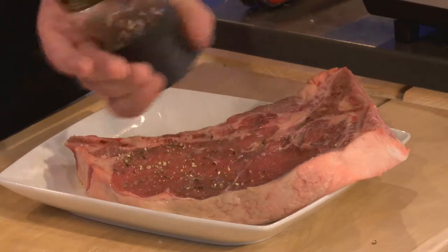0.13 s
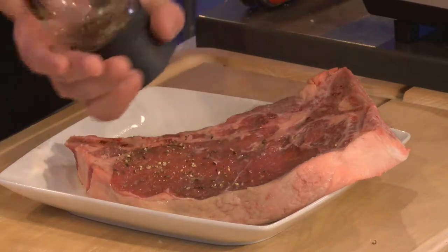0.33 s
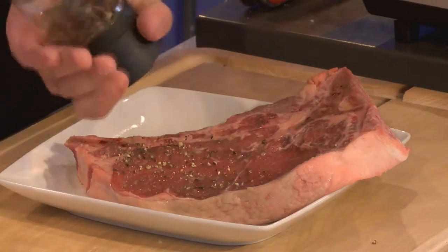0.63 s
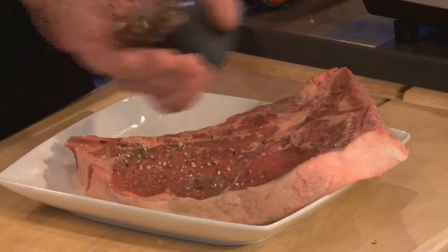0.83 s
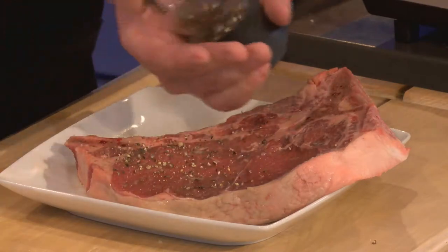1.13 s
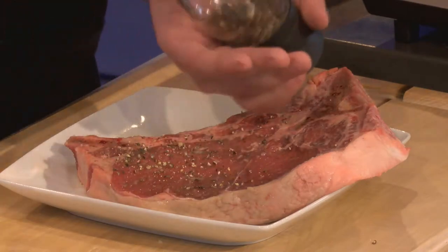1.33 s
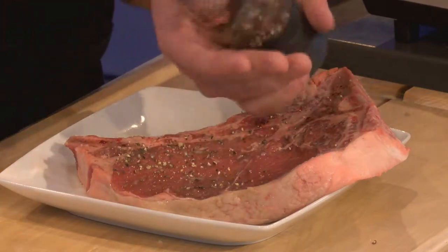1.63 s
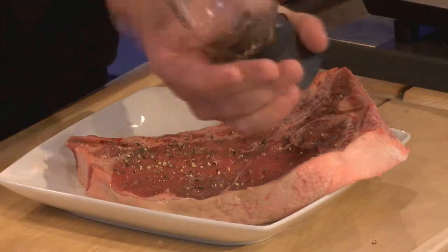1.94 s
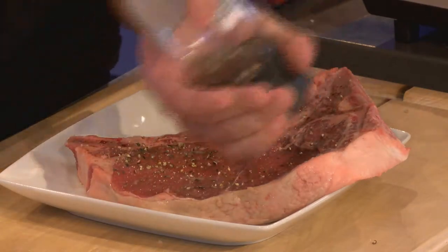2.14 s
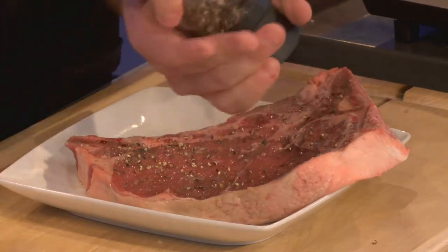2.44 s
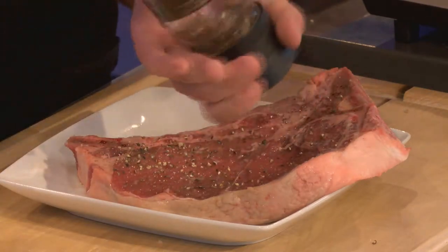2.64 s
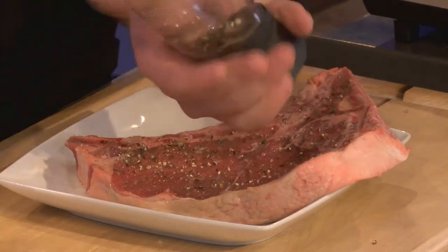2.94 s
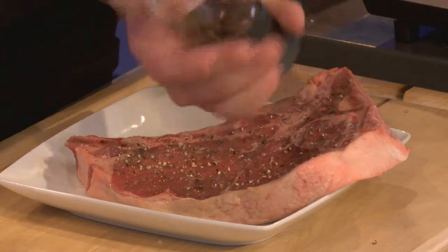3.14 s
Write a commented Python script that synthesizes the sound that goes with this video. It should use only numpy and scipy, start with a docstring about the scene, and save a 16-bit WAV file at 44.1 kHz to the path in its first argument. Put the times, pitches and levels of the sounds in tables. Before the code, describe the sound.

Pepper grinder crunching in brief, uneven twists, with light knocks and pepper ticking down between

```python
"""Pepper mill in a quiet kitchen

A pepper mill is twisted by hand over a steak, close to a microphone. In each of eight strokes peppercorns
crack over a bed of finer crunching: random bursts of splinters and grains, coloured by the mill's body.
The mechanism knocks in its play, and loose pepper ticks and trickles, made of random ticks and noise.
Filtered noise makes a low room rumble and hiss, and sine waves make two appliance tones."""
import sys
import numpy as np
from scipy import signal
from scipy.fft import rfft, irfft, next_fast_len
from scipy.io import wavfile

SR = 44100
rng = np.random.default_rng(int(sys.argv[2]) if len(sys.argv) > 2 else 0)


def int16_out(signal):
    """Quantize to a 16-bit WAV file."""
    q = np.round(np.clip(np.atleast_2d(signal).T, -1, 1) * 32767)
    wavfile.write(sys.argv[1], SR, q.astype(np.int16))


N = 145530
SIZE = 4096  # samples in one short sound
LIGHT_SPLINTER_S = 0.00046  # decay of the splinters in light contacts

# Twists of the mill. Each row: start in seconds, end in seconds, base level of the fine crunch in dB,
# change of the low middle with the grip in dB.
TWISTS = [(0.238, 0.33, -38, -2), (0.622, 0.726, -36.5, 1), (1.024, 1.102, -41, 1.5),
          (1.392, 1.484, -35, 0), (1.768, 1.848, -40, -4), (2.514, 2.555, -41.5, -2.5),
          (2.684, 2.792, -37, -1.5), (3.13, 3.181, -36.5, -5.5)]


def cracks():
    """Each corn breaks with its own colour and rings the mill."""
    # Peppercorns cracking. Each row: start in seconds, level in dB, extra bass in dB,
    # extra burr ring in dB, extra treble in dB, decay of the splinters in seconds.
    corns = [(0.247, -33, 9, 8, 2, 0.0013), (0.2631, -33, -13, 6, 0, 0.0044),
             (0.2741, -28, -13.5, 1.5, 0, 0.0016), (0.2821, -30, 8, 9.5, 2, 0.00091),
             (0.2964, -33.5, 3, 12, -13, 0.00062), (0.3035, -41.5, 3, 3, 2, 0.0009),
             (0.3234, -39, -8, 5, 0, 0.00047), (0.3402, -34, 2, -9, -3, 0.00066),
             (0.3482, -43, -11, 3, 4, 0.00038), (0.365, -43.5, 6.5, -2, -10, 0.00033),
             (0.6042, -42.5, -16, -5, -5, 0.0021), (0.6221, -37.5, -2, -3, -4, 0.0012),
             (0.6329, -33, -3, 2, -5, 0.001), (0.6382, -35.5, 10, 0, 2, 0.0007),
             (0.6455, -32, 4, 1.5, 1, 0.00073), (0.651, -28, 8, 5.5, -3, 0.00061),
             (0.657, -34, -16, 0, 2, 0.00062), (0.6619, -31.5, -3, -2, -7, 0.00067),
             (0.6708, -26, 6, 6.5, 2.5, 0.0017), (0.6769, -28, -2, -3, -9, 0.0024),
             (0.693, -37, -11, 13, -8, 0.0008), (0.7123, -33, -16, -3, -19, 0.00076),
             (0.729, -35.5, 2.5, -4, -2.5, 0.00046), (1.0265, -39, -1, -7, -3, 0.00076),
             (1.047, -37, 3, 3, -5, 0.0009), (1.0552, -35.5, -7, -4, -2.5, 0.00096),
             (1.0624, -39, 6, -4, -16, 0.001), (1.0683, -41, 13, 3, -5, 0.0013),
             (1.0896, -38.5, 5, -9, 4, 0.00071), (1.0935, -29, 11.5, 7, -9, 0.00054),
             (1.1021, -26.5, -1.5, 7, -6.5, 0.0003), (1.1281, -35.5, -11, 7, -12, 0.00041),
             (1.1372, -36.5, -13, -5, 0.5, 0.0016), (1.3828, -37, 7.5, 5, 1, 0.0022),
             (1.3999, -34, 5, 4, 6, 0.00018), (1.406, -25, 7, 1.5, 0.5, 0.001),
             (1.4101, -31.5, 8, 7, 6, 0.0027), (1.417, -41, 4, 5, -4, 0.001),
             (1.434, -36, 0, -2, 1, 0.00042), (1.4494, -22.5, -4, -4, 0, 0.0013),
             (1.458, -25, -1, -3, -0.5, 0.0013), (1.469, -31, -10, -1, -5, 0.00044),
             (1.4798, -35, 4.5, 1, -1, 0.0013), (1.4953, -37, -1, -5, -12, 0.00032),
             (1.7681, -32, -2.5, -3.5, -5, 0.0072), (1.777, -29, -5, 4.5, -5, 0.00085),
             (1.786, -33.5, -5, -6, -6, 0.00052), (1.8006, -31.5, -4, 5, 3, 0.0013),
             (1.807, -31, 2, -10, -13, 0.00023), (1.8134, -27.5, -10, 2.5, 0.5, 0.00074),
             (1.819, -36.5, 4, -5, -7, 0.00088), (1.8344, -34.5, -2, -5, -6, 0.00076),
             (1.8443, -30, -4.5, 0, -4, 0.0013), (1.8472, -39, -2, 0, -18, 0.0017),
             (1.8599, -39, -8, -3, -14, 0.00091), (2.5141, -38, 10, 5, -8, 0.0013),
             (2.523, -32, 3.5, 10, 5, 0.00033), (2.531, -29.5, -1, 5, 0.5, 0.00062),
             (2.5454, -36, 1, 2, -2, 0.00045), (2.6843, -37.5, 5, 7, -5, 0.0011),
             (2.697, -37.5, 8, 0, -8, 0.0013), (2.7087, -24.5, 4, 3, 3.5, 0.0058),
             (2.7182, -38, -1, -8, 2, 0.0009), (2.7305, -32.5, -6, -9, -11, 0.00083),
             (2.745, -27, 12.5, 4.5, 3.5, 0.0004), (2.7603, -26.5, -8, 1, -0.5, 0.00031),
             (2.7734, -32.5, -11, -1, -14, 0.00036), (2.7804, -30, 8, 4.5, -0.5, 0.0009),
             (2.7842, -35, 7, 7, 4, 0.00041), (2.789, -36, 2, -4, -5, 0.0008),
             (2.8068, -31.5, 3, 8.5, 2, 0.0013), (2.865, -38.5, 11, 8, 13.5, 0.00075),
             (2.8762, -49, 6, -4, 15, 0.00053), (2.8894, -44, 8, 1, 18, 0.00057),
             (3.1452, -32.5, -22, -3, -3, 0.00058), (3.152, -30.5, -14, 3, -6, 0.00064),
             (3.1635, -31, -6, 3, 0.5, 0.00096), (3.1675, -32, 4.5, 0.5, -8, 0.00069),
             (3.1765, -35, -2, -10, -8, 0.0014)]
    out = np.zeros(N)
    for start, db, bass, ring, treble, decay_s in corns:
        # the grip is that of the twist whose end is nearest
        nearest = min(TWISTS, key=lambda twist: abs(twist[1] - start))
        grip_db = nearest[3]
        curve = [(550, bass), (950, 0), (2500, 0), (3500, ring), (4600, ring), (8000, treble)]
        own_db = along(curve, grid())
        add(out, start, db, fracture(body(grip_db) + own_db, decay_s))
    return out


def fracture(colour_db, decay_s):
    """A snap, splinters and crumbs; bending waves carry the treble through the mill ahead of the bass."""
    snap, rise_s = 0.12, 0.0003  # strength of the first snap; build-up of what follows
    splinter_db, crumble_db, crumble_s = -7.5, -22.5, 0.0042
    bending_s = 0.0006  # delay of the lowest pitches
    t = np.arange(SIZE) / SR
    shards = rng.choice([-1, 1], SIZE) * (rng.random(SIZE) < 0.5)
    splinters = amp(splinter_db) * np.exp(-t / decay_s)
    crumbs = amp(crumble_db) * np.exp(-t / crumble_s)
    force = shards * (1 - np.exp(-t / rise_s)) * (splinters + crumbs)
    force[0] = snap
    delay_s = bending_s / (1 + grid() / 3000)
    # adding up the delays over frequency gives the phase shift
    shift = np.exp(-2j * np.pi * np.cumsum(delay_s) * SR / SIZE)
    travel = irfft(shift * rfft(causal(colour_db)))
    return signal.fftconvolve(force, travel[:SIZE // 2])[:SIZE]


def body(grip_db):
    """The mill's dB response; the grip of each twist changes its low middle by a different amount."""
    # The mill's broad response to a crack. Each row: pitch in Hz, level in dB.
    broad = [(30, -9), (130, -8.5), (220, -7), (500, -8), (700, -7.5), (950, -7.5), (1500, -3), (2200, -1),
             (3000, -3), (4300, -3.5), (4900, -5.5), (7000, -5), (10000, -14.5), (16000, -18.5)]
    grip = [(380, 0.0054), (600, grip_db), (850, grip_db), (1080, 0.0075)]
    return along(broad, grid()) + resonances() + along(grip, grid())


def resonances():
    """The mill's body lifts the sound around its own ringing pitches, given as a curve in dB."""
    # Ringing pitches of the mill. Each row: pitch in Hz, width in Hz, lift in dB.
    modes = [(297, 84, 9.5), (1129.3, 73, 13), (1280, 200, 1.5), (2010, 61, 4), (2240, 116, 3.5),
             (3920, 490, 6), (6450, 140, 5)]
    lift_db = 0
    for hz, width, db in modes:
        nearness = 1 / (1 + (2 * (grid() - hz) / width) ** 2)
        lift_db = lift_db + 10 * np.log10(1 + (amp(db) ** 2 - 1) * nearness)
    return lift_db


def crunch():
    """Fragments are crushed finer for as long as the burr turns, hardest in mid stroke."""
    # Extra colour of the fine crunch. Each row: pitch in Hz, level in dB.
    tilt = [(100, 4), (1000, 0), (4000, -1.5), (12000, -3.5)]
    rise_s, fall_s, arch_db = 0.0049, 0.0086, 4.5  # edges of a stroke; swell towards its middle
    t, out = np.arange(N) / SR, np.zeros(N)
    crushing = clumps() * grains(6000, 8)
    for start, end, db, grip_db in TWISTS:
        arch = np.sin(np.pi * np.clip((t - start) / (end - start), 0, 1))
        before, after = np.minimum(t - start, 0), np.maximum(t - end, 0)
        edges = np.exp(before / rise_s - after / fall_s)
        response = causal(body(grip_db) + along(tilt, grid()))
        coloured = unit(signal.fftconvolve(crushing, response)[:N])
        out += amp(db + arch_db * (arch - 1.5)) * edges * coloured
    return out


def clumps():
    """The fine crunch comes in clumps: a fast random gain."""
    per_s, spread_db = 260, 2  # new random values per second; their spread
    knots = np.clip(rng.standard_normal(N), -2, 2)
    return amp(spread_db * np.interp(np.arange(N) * per_s / SR, np.arange(N), knots))


def pings():
    """A corn that slips free leaves the burr ringing on one note."""
    # Ringing notes. Each row: start in seconds, pitch in Hz, level in dB before a cut of 2 dB.
    notes = [(0.283, 1090, -34), (1.406, 1161, -32), (2.2538, 1150, -53), (2.533, 3320, -34.5)]
    decay_s, rise_s = 0.007, 0.00075
    out, t = np.zeros(N), np.arange(SIZE) / SR
    for start, hz, db in notes:
        tone = np.sin(2 * np.pi * (hz * t + rng.random()))
        add(out, start, db - 2, tone * np.exp(-t / decay_s) * (1 - np.exp(-t / rise_s)))
    return out


def knocks():
    """The mechanism knocks lightly in its play, and each knock rings the mill's body."""
    # Knocks. Each row: start in seconds, level in dB, extra brightness in dB.
    hits = [(.004, -51, 0), (0.156, -55.5, -5), (0.23, -48, 1), (0.5573, -45.5, -3), (.6135, -47, 5),
            (0.912, -46.5, -29), (0.941, -53, 4), (1.008, -50.5, 5), (1.2826, -42, -3.5),
            (1.667, -50.5, -16), (1.702, -53.5, -2), (2.112, -55.5, 10), (2.503, -45.5, 11),
            (2.656, -50, 13), (2.933, -44, -6), (2.969, -41.5, 5), (2.987, -40.5, 16), (3.132, -42.5, 9),
            (3.239, -39.5, 8.5)]
    # Colour of a knock. Each row: pitch in Hz, level in dB.
    knock_colour = [(60, -19), (300, -0.5), (700, -7), (1150, -1), (1500, 3), (2200, 0.5), (4000, -4),
                    (6000, -24.5), (16000, -25)]
    out = np.zeros(N)
    for start, db, bright in hits:
        bright_db = along([(1300, 0), (3500, bright)], grid())
        colour_db = along(knock_colour, grid()) + resonances() + bright_db
        add(out, start, db, fracture(colour_db, LIGHT_SPLINTER_S))
    return out


def finger_bumps():
    """Fingers bump softly on the mill: single dull impulses."""
    # Bumps. Each row: start in seconds, level in dB.
    touches = [(0.558, -47), (1.313, -49.5), (1.66, -49), (2.054, -45.5), (2.065, -45.5), (2.072, -50),
               (2.459, -54.5)]
    # Colour of a bump. Each row: pitch in Hz, level in dB.
    touch_colour = [(40, -10), (130, 6), (300, -7), (600, -16), (1200, -36), (4000, -41)]
    out = np.zeros(N)
    for start, db in touches:
        add(out, start, db, causal(along(touch_colour, grid())))
    return out


def jolts():
    """The hardest corns jolt the whole mill: a low tone that dies away at once."""
    # Jolts. Each row: start in seconds, strength in dB before the build-up softens it.
    shoves = [(.672, -31), (1.105, -38), (1.458, -32.5), (2.712, -25)]
    pitch_hz, decay_s, rise_s = 52.4, 0.0038, 0.0003
    t, pushes = np.arange(SIZE) / SR, np.zeros(N)
    for start, db in shoves:
        pushes[round(start * SR)] = amp(db)
    thump = np.cos(2 * np.pi * pitch_hz * t) * np.exp(-t / decay_s) * (1 - np.exp(-t / rise_s))
    return signal.fftconvolve(pushes, thump)[:N]


def trickle():
    """Loose pepper falls as fine dust, small ticks and a few coarse flakes, and rings the mill a little."""
    # Level of the trickle over time. Each row: time in seconds, level in dB.
    flow = [(0, -51), (.2, -61.5), (.39, -54), (.56, -67.5), (.77, -51), (.98, -62.5), (1.18, -53.5),
            (1.3, -57), (1.37, -60), (1.52, -47.5), (1.64, -59), (1.71, -54.5), (1.75, -60), (1.88, -50),
            (2.0, -54.5), (2.195, -67.5), (2.211, -47.5), (2.25, -48.5), (2.28, -49), (2.345, -51),
            (2.364, -69), (2.44, -62), (2.561, -55), (2.65, -64), (2.83, -52), (2.981, -48.5), (3.1, -67.5),
            (3.2, -48.5), (3.3, -51)]
    # Colour of loose pepper. Each row: pitch in Hz, level in dB.
    pepper_colour = [(100, -23), (350, -6.5), (800, -12.5), (1140, -10), (1500, -14), (2100, -3),
                     (2900, -4.5), (4000, -1), (7500, 4), (10500, -4), (16000, -3)]
    # Coarse flakes landing. Each row: start in seconds, level in dB.
    flakes = [(.442, -50.5), (0.471, -58), (.558, -49.5), (0.595, -50.5), (.853, -48), (.91, -46),
              (1.149, -53), (1.287, -48.5), (1.711, -44.5), (1.956, -48), (2.019, -48.5), (2.213, -52),
              (2.2459, -43), (2.2532, -44.5), (2.35, -46.5), (2.438, -47), (2.923, -46), (2.9498, -49),
              (2.965, -44), (3, -46)]
    dust_db = -9.5  # compared with the ticks
    ring_share = 0.67  # share of the mill's dB lift
    colour_db = along(pepper_colour, grid()) + ring_share * resonances()
    fall = ticks() + amp(dust_db) * rng.standard_normal(N)
    level_db = np.interp(np.arange(N) / SR, *np.transpose(flow))
    out = unit(signal.fftconvolve(fall, causal(colour_db))[:N]) * amp(level_db)
    for start, db in flakes:
        add(out, start, db, fracture(colour_db, LIGHT_SPLINTER_S))
    return out


def ticks():
    """Tiny impacts of uneven size, each a dying burst of noise; overall strength (rms) 1."""
    decay_s = 0.00072  # of the energy of one tick
    impacts = grains(650, 5.5) ** 2
    energy = signal.fftconvolve(impacts, np.exp(-np.arange(SIZE) / SR / decay_s))[:N]
    return unit(np.sqrt(np.abs(energy)) * rng.standard_normal(N))


def kitchen(x):
    """The room adds a short faint tail: noise whose treble dies away sooner than its bass."""
    # Time to fade by 60 dB. Each row: pitch in Hz, time in seconds.
    fade_times = [(200, 0.57), (2000, 0.41), (12000, 0.19)]
    tail_db = -17
    hz, t, noise = signal.stft(rng.standard_normal(SR // 2), SR, nperseg=256)
    fade = amp(-60 * t / along(fade_times, hz)[:, None])
    tail = signal.istft(noise * fade, SR, nperseg=256)[1]
    return signal.fftconvolve(x, amp(tail_db) * tail / np.linalg.norm(tail))[:N]


def room_tone():
    """Low rumble and faint hiss from filtered noise."""
    # Colour of the room noise. Each row: pitch in Hz, level in dB.
    room_colour = [(20, 3.5), (50, -1.5), (130, 0), (200, -4.5), (350, -11.5), (800, -19), (1500, -21.5),
                   (5000, -23), (16000, -77)]
    level_db = -58.5
    noise = filtered(rng.standard_normal(N), lambda hz: amp(along(room_colour, hz)))
    return amp(level_db) * unit(noise)


def appliances():
    """Appliance tones of steady level: sine waves whose phase wanders at random."""
    # Tones. Each row: pitch in Hz, level (rms) in dB.
    hums = [(120, -69), (11636, -78.5)]
    t, out = np.arange(N) / SR, np.zeros(N)
    for hz, db in hums:
        drift = np.cumsum(rng.standard_normal(N)) * hz * 8e-6
        out += amp(db) * np.sqrt(2) * np.sin(2 * np.pi * hz * t + drift)
    return out


def side_part(grinding):
    """A faint stereo side part of the grinding alone, spread in time so that the bass arrives latest."""
    # Level of the side part. Each row: pitch in Hz, level in dB.
    side_levels = [(300, -23), (1500, -32.5), (5000, -31), (14000, -41)]
    smear_s = 0.006  # delay of the lowest pitches

    def response(hz):
        smear = np.exp(-2j * np.pi * smear_s * hz * (1 - hz / SR))
        return amp(along(side_levels, hz)) * smear

    return filtered(grinding, response)


def amp(db):
    """Turn dB into a plain factor."""
    return 10 ** (np.asarray(db) / 20)


def unit(x):
    """Scale a sound to an overall strength (rms) of 1."""
    return x / np.sqrt(np.mean(x ** 2) + 1e-20)


def along(points, hz):
    """Read a curve of (Hz, value) points on a log pitch axis."""
    f, v = np.transpose(points)
    return np.interp(np.log(hz + 1), np.log(f + 1), v)


def filtered(x, response):
    """Multiply the spectrum of x by a function of pitch in Hz."""
    m = next_fast_len(N + SR // 2)
    return irfft(rfft(x, m) * response(np.fft.rfftfreq(m, 1 / SR)), m)[..., :N]


def causal(db):
    """Turn a dB curve into a short response that starts at once and has nothing before its start."""
    c = irfft(np.log(amp(db)))
    c[1:SIZE // 2] *= 2  # fold the backward half of the cepstrum onto the forward half
    c[SIZE // 2 + 1:] = 0
    return irfft(np.exp(rfft(c)))


def grid():
    """The pitches in Hz at which short sounds are coloured."""
    return np.fft.rfftfreq(SIZE, 1 / SR)


def add(track, s, db, sound):
    """Place a short sound at s seconds, its level taken over its first 5 ms."""
    head = sound[:SR // 200]
    part = track[max(0, round(s * SR)):][:len(sound)]
    part += (amp(db) * sound / np.sqrt(np.mean(head ** 2)))[:len(part)]


def grains(per_s, spread_db):
    """Random impulses of uneven size, per_s a second on average; overall strength (rms) 1."""
    spread = np.clip(rng.standard_normal(N), -2, 2)
    size = amp(spread_db * spread) * rng.choice([-1, 1], N)
    return unit(size * (rng.random(N) < per_s / SR))


def scene():
    """Nearly mono, a little to the right; the grinding has a faint side part of opposite sign left and right."""
    # Tilt between the ears. Each row: pitch in Hz, left over right in dB.
    balance = [(100, -1.45), (500, -1.2), (1200, -.65), (5000, -.55), (12000, -.3)]
    grinding = cracks() + crunch()
    mill = grinding + pings() + knocks() + finger_bumps() + jolts() + trickle()
    mid = mill + kitchen(mill) + room_tone() + appliances()
    side = side_part(grinding)
    stereo = np.array([mid + side, mid - side])
    # each ear takes half of the tilt
    return filtered(stereo, lambda hz: amp(np.outer([0.5, -0.5], along(balance, hz))))


def record(dry):
    """Nothing is kept from 15.9 kHz upwards."""
    return filtered(dry, lambda hz: hz < 15900)


dry = scene()
out = record(dry)
int16_out(out)
```